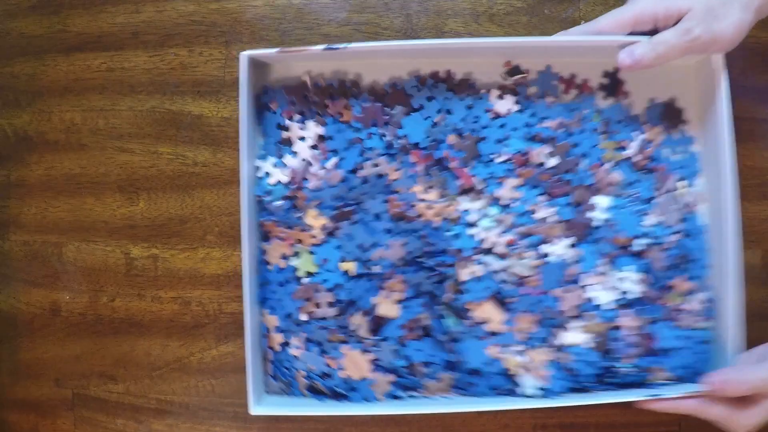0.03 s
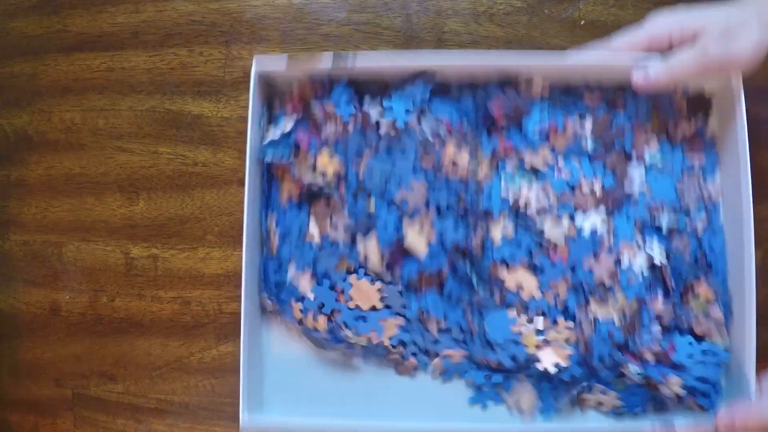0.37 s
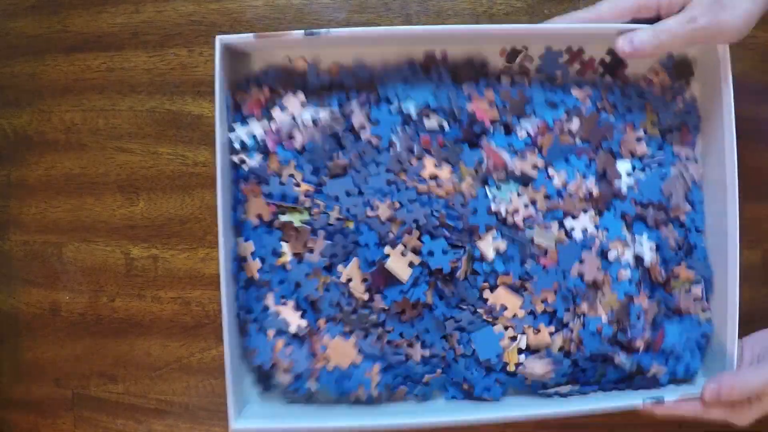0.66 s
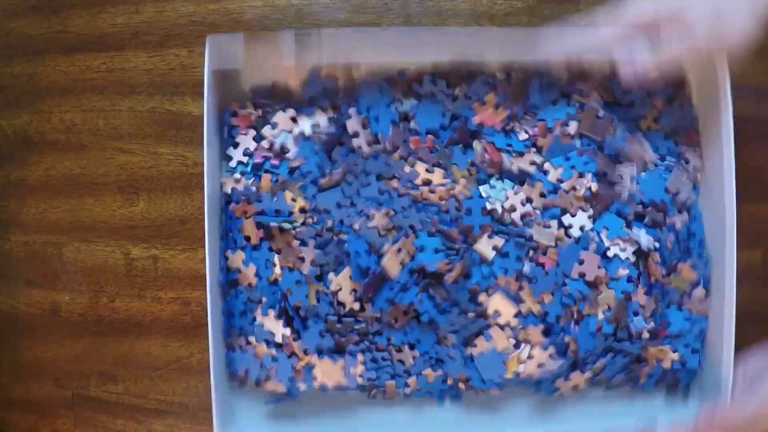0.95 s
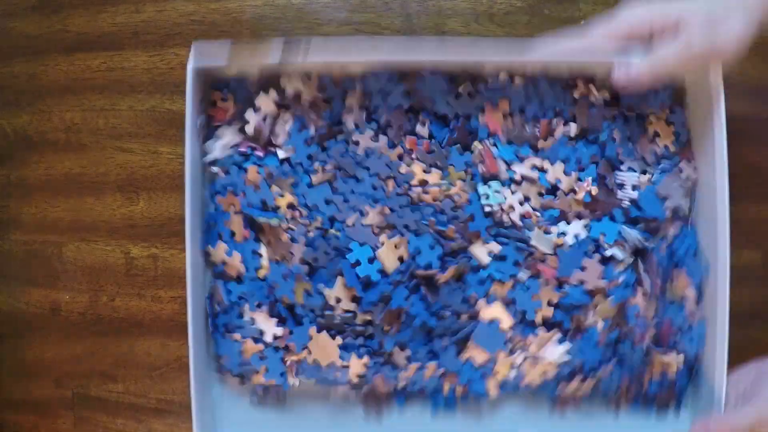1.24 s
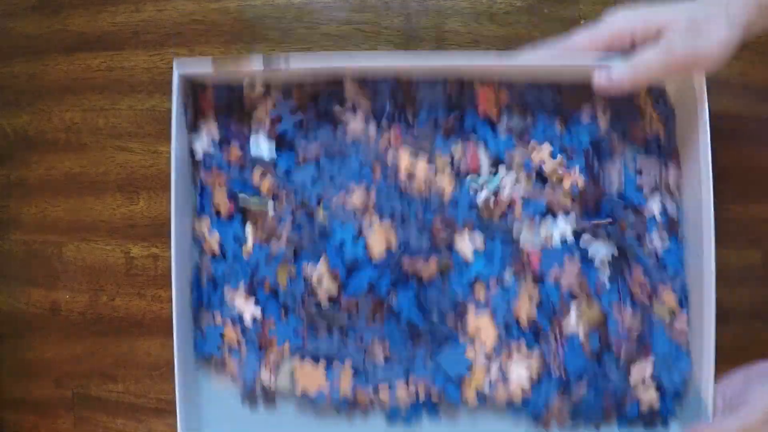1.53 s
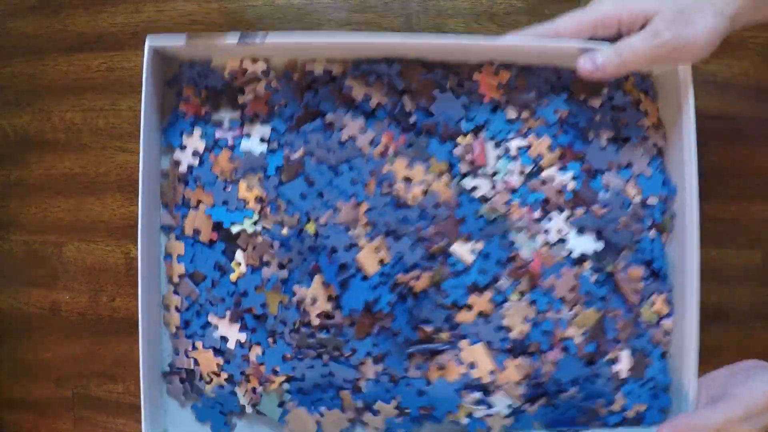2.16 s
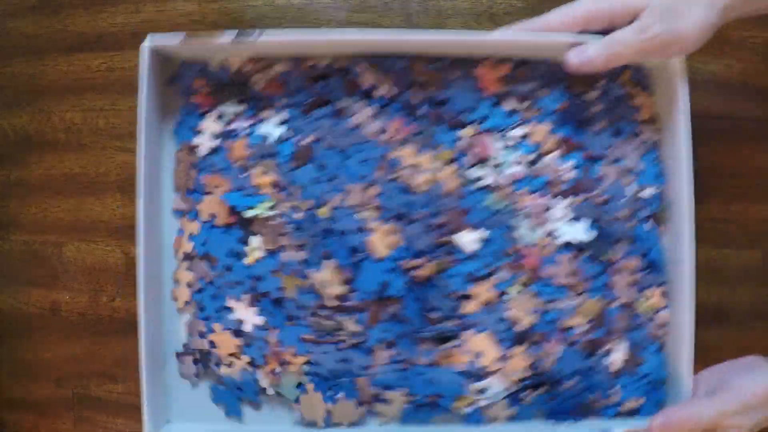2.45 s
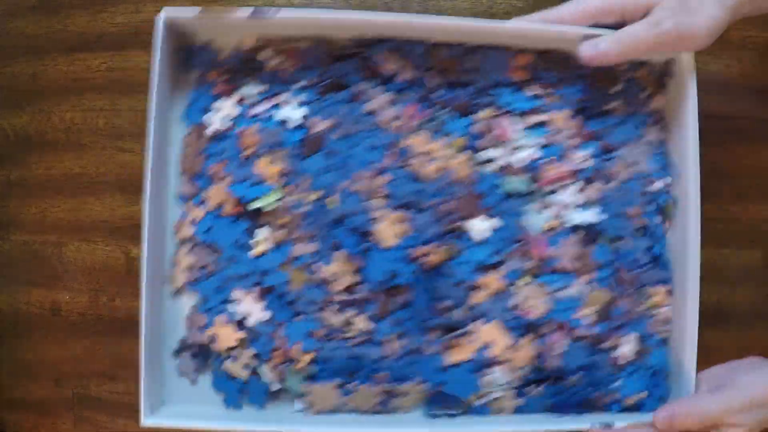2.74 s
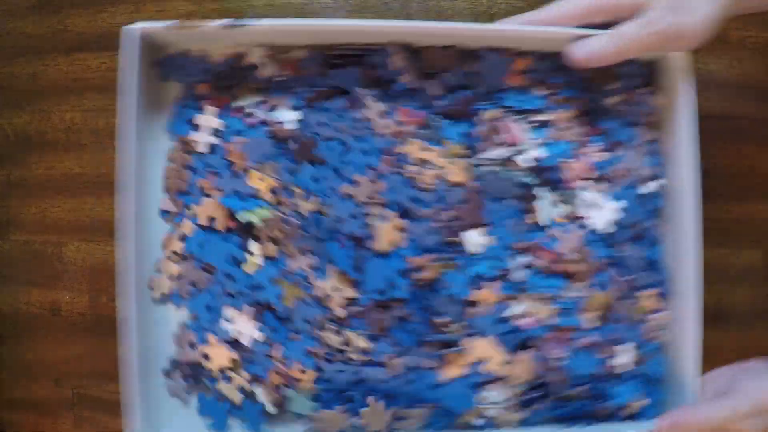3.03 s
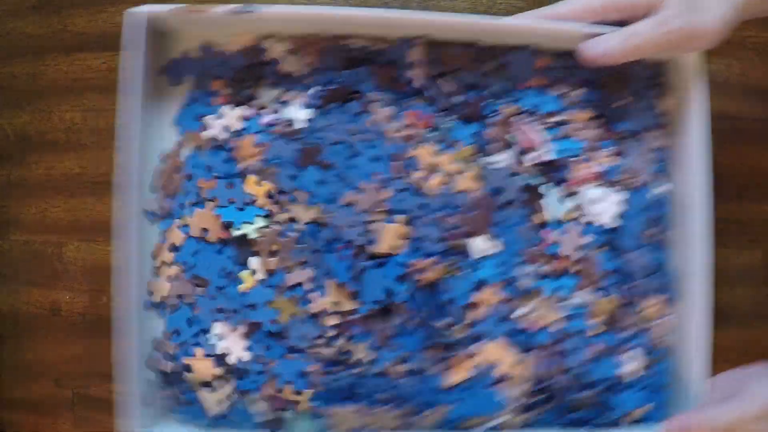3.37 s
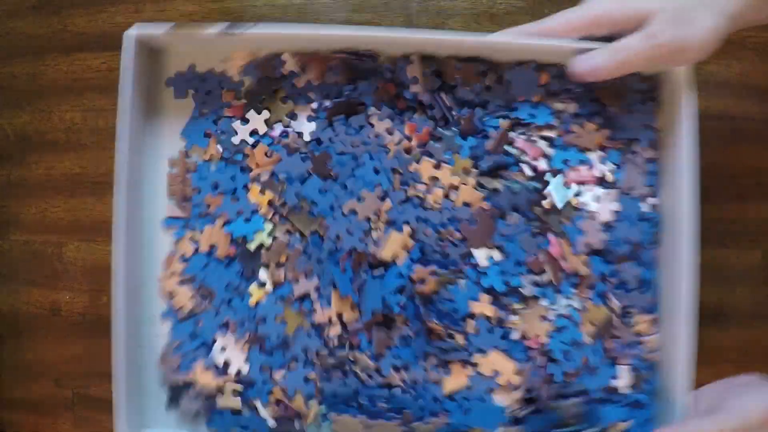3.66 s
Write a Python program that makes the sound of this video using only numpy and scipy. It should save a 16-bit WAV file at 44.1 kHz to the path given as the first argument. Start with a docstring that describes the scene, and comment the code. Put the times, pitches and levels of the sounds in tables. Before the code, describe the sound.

Puzzle pieces rattle and swish in a shaken cardboard box, hard at first, then gentler.

```python
"""A shallow cardboard box of puzzle pieces is shaken, first hard and fast, then more gently.
On each stroke the heap slides and lands: many small contacts click on the pieces and drum on the
bottom and walls of the box. Sliding card swishes and hisses, clumps knock hard on the box, and the
heap keeps churning between strokes. A small room with a low hum adds a short echo.
Underneath, a low handling rumble drifts slowly in level."""
import sys
import numpy as np
from scipy import signal
from scipy.fft import rfft, irfft, next_fast_len
from scipy.io import wavfile
from scipy.ndimage import uniform_filter1d

SR = 44100
rng = np.random.default_rng(int(sys.argv[2]) if len(sys.argv) > 2 else 0)


def pcm_store(signal):
    """Save signal as 16-bit PCM."""
    levels = np.round(np.clip(np.atleast_2d(signal), -1, 1) * 32767)
    wavfile.write(sys.argv[1], SR, levels.astype(np.int16).T)


N = 171990

# Table levels are relative. A mode is a natural ringing tone; a ring time is the time to fade by 60 dB.
# Tone colour of the low handling rumble: (frequency [Hz], level [dB])
RUMBLE_COLOUR = [(20, -5.5), (34, 0), (46, 9.5), (62, -2), (100, -7), (180, -6.5), (400, -7), (1000, -30),
                 (3000, -52), (8000, -41), (15000, -48)]
# Slow drift of the rumble: (time [s], level [dB])
RUMBLE_DRIFT = [(.05, -48), (.7, -49.5), (1.3, -46), (2.25, -49.5), (2.8, -47), (3.9, -48.5)]
# Pieces that keep moving between strokes: (time [s], level [dB])
CHURN_LEVELS = [(0.03, -50.5), (0.18, -40), (0.3, -37.5), (1.2, -31.5), (1.9, -35.5), (2.2, -46),
                (2.6, -38.5), (3.3, -44), (3.9, -33)]
# How the churning is shared out: (bottom [dB], walls [dB], pieces [dB])
CHURN_SHARES = [-6, -10, -15]
# Strokes of the box: (peak time [s], rise [s], fall [s], bottom [dB], walls [dB], pieces [dB])
SHAKE_STROKES = [(0.112, 0.0046, 0.015, -33, -36, -41), (0.269, 0.034, 0.042, -17.5, -24.5, -31.5),
                 (0.359, 0.046, 0.062, -22, -24, -29), (0.517, 0.065, 0.028, -26.5, -34, -38),
                 (0.648, 0.04, 0.035, -20.5, -31.5, -33), (0.758, 0.029, 0.032, -21.5, -34, -38),
                 (0.872, 0.027, 0.037, -17.5, -25, -29), (1.017, 0.056, 0.026, -17.5, -28.5, -31),
                 (1.14, 0.049, 0.027, -19, -26, -27), (1.294, 0.052, 0.032, -17.5, -30.5, -31),
                 (1.401, 0.032, 0.054, -19, -30.5, -35), (1.523, 0.02, 0.042, -19.5, -27.5, -30),
                 (1.685, 0.042, 0.024, -18.5, -26.5, -30), (1.824, 0.046, 0.026, -18, -29, -31.5),
                 (1.962, 0.05, 0.023, -21.5, -36, -36.5), (2.064, 0.051, 0.043, -27.5, -40, -43.5),
                 (2.215, 0.014, 0.01, -31, -46, -56), (2.341, 0.047, 0.033, -27, -40, -43.5),
                 (2.49, 0.085, 0.002, -32, -45, -51), (2.58, 0.046, 0.031, -25.5, -37, -40.5),
                 (2.741, 0.064, 0.012, -27, -37.5, -42), (2.855, 0.042, 0.053, -25, -34, -37),
                 (3.05, 0.071, 0.029, -27.5, -42.5, -44), (3.197, 0.072, 0.028, -26, -34.5, -38.5),
                 (3.39, 0.074, 0.044, -28.5, -43, -43.5), (3.507, 0.03, 0.11, -26.5, -36, -38),
                 (3.71, 0.044, 0.052, -27, -40, -41), (3.878, 0.01, 0.0092, -40, -35.5, -57)]
# Modes of the box's bottom and of its walls: (frequency [Hz], level [dB], ring time [s])
BOTTOM_MODES = [(370.4, -14, 0.096), (392, -13.5, 0.049), (467.2, -8.5, 0.046), (564.6, -7, 0.071),
                (573.2, -0.5, 0.066), (660, -5, 0.06), (721.4, -9, 0.041), (763.2, 1, 0.045),
                (801, -7, 0.049), (892, -8.5, 0.023)]
WALL_MODES = [(962, -0.5, 0.012), (1145, 2, 0.026), (1251, -4.5, .025), (1378, -11, 0.087),
              (1521, -7.5, 0.039), (1678, -10, 0.013)]
# The bottom sounds higher or lower as the heap moves on it: (time [s], tilt to treble [dB per octave])
BOTTOM_BRIGHTNESS = [(.25, 1.5), (.42, 3.5), (.85, 5.5), (1.0, 0.5), (1.2, -0.5), (1.8, 3.5), (2.2, -0.5),
                     (2.8, -3), (3.9, -6)]
# Tone colour of one piece's click: (frequency [Hz], level [dB])
CLICK_COLOUR = [(300, -27), (1000, 11), (1600, -11.5), (1950, -2.5), (2350, 4.5), (2900, 4.5), (3400, -2),
                (4100, -12.5), (5000, -8.5), (6100, -23.5), (7400, -20.5), (8800, -33), (10200, -29.5),
                (15000, -35)]
# Tone colour of pieces sliding on each other: (frequency [Hz], level [dB])
SWISH_COLOUR = [(300, 1), (1500, 0), (2800, 4.5), (4100, -7), (5100, -8), (7500, -18.5), (8800, -27.5),
                (10300, -24.5), (15000, -32)]
# Hard knocks: (time [s], box ring [dB], pitch the struck spot favours [Hz], slap [dB])
HARD_KNOCKS = [(.107, -36.5, 690, -47), (.126, -46, 790, -44), (.223, -41, 800, -57), (.243, -22, 890, -33),
               (.264, -21.5, 870, -27.5), (.323, -18, 780, -36), (.339, -18.5, 746, -27),
               (.37, -14.5, 700, -24.5), (.607, -23, 760, -38), (.651, -21.5, 680, -36),
               (.752, -28, 720, -43), (.895, -23, 890, -22.5), (.909, -29, 800, -28),
               (1.027, -15, 630, -32), (1.128, -13.5, 770, -31), (1.144, -17, 754, -19),
               (1.281, -19, 750, -41), (1.308, -24.5, 735, -39), (1.394, -19.5, 680, -31.5),
               (1.521, -14.5, 633, -36), (1.681, -17.5, 790, -35), (1.701, -21, 770, -27.5),
               (1.825, -17, 815, -48), (2.2, -37.5, 790, -58), (2.291, -38, 1270, -40.5),
               (2.486, -27.5, 760, -40.5), (2.521, -24, 755, -49), (2.61, -29, 690, -45),
               (2.732, -23.5, 590, -57), (2.807, -24, 1150, -34), (2.829, -35, 1300, -48),
               (2.855, -21, 680, -55), (3.119, -30, 1250, -46), (3.207, -30, 970, -50),
               (3.43, -31, 1130, -62), (3.48, -30.5, 1120, -41), (3.493, -28, 1400, -53),
               (3.501, -22.5, 590, -41), (3.536, -24.5, 636, -35), (3.876, -33, 710, -30.5)]
# The heap skids over bare card: (peak time [s], half length [s], level [dB])
HEAP_SKIDS = [(0.132, 0.0033, -47.5), (0.365, 0.031, -35.5), (0.904, .012, -41.5), (1.16, 0.029, -42),
              (3.486, 0.0024, -39.5)]
# Tone colour of a skid: (frequency [Hz], level [dB])
SKID_COLOUR = [(1000, -32), (4000, 7), (5200, 4), (7800, -2), (8800, -10), (10300, -8.5), (15000, -20.5)]
# How long the room echoes: (frequency [Hz], ring time [s])
ROOM_RING_TIMES = [(200, 0.62), (1000, 0.41), (4000, 0.75), (12000, .18)]

RUMBLE_GAIN_DB, HUM_DB, HUM_HZ = 3, -57, 120
STROKE_SHAPE, STROKE_DROP_DB = 1.77, 6  # lower shape = sharper peak; drop one rise or fall from the peak
CONTACTS_PER_S, SIZE_SPREAD_DB, CLICK_SPREAD_DB = 1300, 4.5, 4
MODE_RISE_S, CLICK_RING_S, SLAP_RING_S = 0.00066, 0.0018, 0.04
BOTTOM_GAIN_DB, WALL_GAIN_DB, CLATTER_GAIN_DB, SWISH_GAIN_DB, ECHO_GAIN_DB = -2, -0.5, -4, -3, -11.5
KNOCK_REACH_OCTAVES, KNOCK_SCATTER_S, KNOCK_SPAN_S = 0.29, 0.001953, 0.008
TIME = np.arange(N) / SR


def amp(db):
    """Turn decibels into a factor to multiply by."""
    return 10 ** (np.asarray(db) / 20)


def unit(x):
    """Scale a sound to an average power of 1."""
    return x / np.sqrt(np.mean(x ** 2) + 1e-20)


def at_time(points):
    """Join (time, value) points into a curve with one value per sample."""
    return np.interp(TIME, *np.transpose(points))


def at_pitch(points, hz):
    """Read between (frequency, value) points, with octaves evenly spaced."""
    freqs, values = np.transpose(points)
    return np.interp(np.log(hz + 1), np.log(freqs + 1), values)


def filtered(x, gain_at):
    """Multiply each frequency in a sound by gain_at(frequency)."""
    size = next_fast_len(N + SR // 2)
    return irfft(rfft(x, size) * gain_at(np.fft.rfftfreq(size, 1 / SR)), size)[:N]


def noise(colour):
    """Noise with the given tone colour and a power of 1."""
    return unit(filtered(rng.standard_normal(N), lambda hz: amp(at_pitch(colour, hz))))


def convolved(x, response):
    """Let every sample of x set off a copy of the response, scaled to an energy of 1."""
    return signal.oaconvolve(x, response / np.linalg.norm(response))[:N]


def add(track, start_s, sound):
    """Mix a sound into a track."""
    part = track[max(round(start_s * SR), 0):][:len(sound)]
    part += sound[:len(part)]


def random_sizes(spread_db, limit=1.35):
    """Random factors, none more than `limit` spreads above the usual size."""
    return amp(spread_db * np.minimum(rng.standard_normal(N), limit))


def rumble_and_hum():
    """A low handling rumble drifts slowly in level over a steady mains hum."""
    rumble = amp(RUMBLE_GAIN_DB + at_time(RUMBLE_DRIFT)) * noise(RUMBLE_COLOUR)
    return rumble + amp(HUM_DB) * unit(np.sin(2 * np.pi * HUM_HZ * TIME))


def shaking():
    """How hard bottom, walls and pieces are hit: each stroke swells and fades on top of the churning."""
    power = amp(at_time(CHURN_LEVELS) + np.array(CHURN_SHARES)[:, None]) ** 2
    for peak_s, rise, fall, *levels_db in SHAKE_STROKES:
        near = abs(TIME - peak_s) < .3
        away = np.maximum((peak_s - TIME[near]) / rise, (TIME[near] - peak_s) / fall)
        swell = amp(-STROKE_DROP_DB * abs(away) ** STROKE_SHAPE)
        power[:, near] += (amp(levels_db)[:, None] * swell) ** 2
    return np.sqrt(power)


def contacts():
    """Pieces land as tiny taps of random time and size, evened out to a power of 1."""
    hits = (rng.random(N) < CONTACTS_PER_S / SR) * random_sizes(SIZE_SPREAD_DB)
    local_power = abs(uniform_filter1d(hits ** 2, size=2205))
    return hits / np.sqrt(local_power + 1e-9)


def ring(hz, ring_s):
    """One mode rings and fades. Card is soft, so the tone takes a moment to build up."""
    t = np.arange(SR // 8) / SR
    build_up = 1 - np.exp(-t / MODE_RISE_S)
    return np.sin(2 * np.pi * hz * t) * amp(-60 * t / ring_s) * build_up


def drumming(force, modes, tilt_db=0, pivot_hz=680):
    """Taps land all over a cardboard panel, so each one pushes or pulls each mode at random."""
    sound = np.zeros(N)
    for hz, db, ring_s in modes:
        strength = amp(db + tilt_db * np.log2(hz / pivot_hz))
        direction = np.sign(rng.standard_normal(N))
        sound += convolved(force * strength * direction, ring(hz, ring_s))
    return sound / np.linalg.norm([amp(db) for _, db, _ in modes])


def click(ring_s, size=2048):
    """A piece clicks: a short burst of noise with the colour of stiff card, new each time."""
    colour_db = at_pitch(CLICK_COLOUR, np.fft.rfftfreq(size, 1 / SR))
    # Build a filter that responds as early as it can (minimum phase), to keep the click sharp.
    cepstrum = irfft(colour_db * np.log(10) / 20)
    cepstrum[1:size // 2] *= 2
    cepstrum[size // 2:] = 0
    card_filter = np.exp(rfft(cepstrum))
    burst = rng.standard_normal(size) * amp(-60 * np.arange(size) / SR / ring_s)
    return irfft(card_filter * rfft(burst))


def clatter(force, count=14):
    """Each tap clicks one of several unlike pieces; edge-on taps are louder than flat ones."""
    piece = rng.integers(count, size=N)
    taps = force * unit(random_sizes(CLICK_SPREAD_DB))
    return sum(convolved(taps * (piece == k), click(CLICK_RING_S)) for k in range(count))


def swish(strength, growth=0.92, pivot_db=-30):
    """Card faces rub together: a noise that follows the clatter but swells a little less."""
    swell = (strength / amp(pivot_db)) ** growth
    return amp(SWISH_GAIN_DB + pivot_db) * swell * noise(SWISH_COLOUR)


def knocks():
    """A clump hits the box hard: card slaps, and modes near one pitch ring, not quite together."""
    track = np.zeros(N)
    span = round(KNOCK_SPAN_S * SR)  # levels count as if all the energy fell in this many samples
    for time_s, ring_db, spot_hz, slap_db in HARD_KNOCKS:
        body = np.zeros(SR // 8)
        for hz, db, ring_s in BOTTOM_MODES + WALL_MODES:
            favour = np.exp(-(np.log2(hz / spot_hz) / KNOCK_REACH_OCTAVES) ** 2)
            add(body, KNOCK_SCATTER_S * rng.random(), amp(db) * favour * ring(hz, ring_s))
        slap = click(SLAP_RING_S)
        add(track, time_s, amp(ring_db) * body * np.sqrt(span) / np.linalg.norm(body))
        add(track, time_s, amp(slap_db) * slap * np.sqrt(span) / np.linalg.norm(slap))
    return track


def skids():
    """The heap skids over bare card with brief, bright hisses."""
    swells = sum(amp(db) * np.exp(-((TIME - peak_s) / half_s) ** 2 / 2)
                 for peak_s, half_s, db in HEAP_SKIDS)
    return swells * noise(SKID_COLOUR)


def open_box(x, cutoff_hz=370):
    """A light, open cardboard box gives off hardly any bass."""
    return signal.sosfilt(signal.butter(3, cutoff_hz, "highpass", fs=SR, output="sos"), x)


def room_echo(x):
    """The small room answers with a short wash of echoes; the highest treble dies first."""
    hz, t, spectrum = signal.stft(rng.standard_normal(SR // 2), SR, nperseg=256)
    fade = amp(-60 * t / at_pitch(ROOM_RING_TIMES, hz)[:, None])
    _, tail = signal.istft(spectrum * fade, SR, nperseg=256)
    delay = np.zeros(SR // 250)
    return amp(ECHO_GAIN_DB) * convolved(x, np.r_[delay, tail])


def scene():
    """The same taps sound on box and pieces; sliding, knocks, echo, rumble and hum join them."""
    on_bottom, on_walls, on_pieces = shaking()
    hits = contacts()
    bottom = amp(BOTTOM_GAIN_DB) * drumming(on_bottom * hits, BOTTOM_MODES, at_time(BOTTOM_BRIGHTNESS))
    walls = amp(WALL_GAIN_DB) * drumming(on_walls * hits, WALL_MODES)
    sliding = swish(on_pieces)
    clicks = amp(CLATTER_GAIN_DB) * clatter(on_pieces * hits)
    box = open_box(bottom + walls + clicks + sliding + skids() + knocks())
    return (box + room_echo(box) + rumble_and_hum())[None]


def record(dry, start_s=0.03, top_hz=15500):
    """The sound starts after a moment of silence, and the very highest treble is cut off."""
    return filtered(dry[0] * (TIME > start_s), lambda hz: hz < top_hz)[None]


dry = scene()
out = record(dry)
pcm_store(out)
```